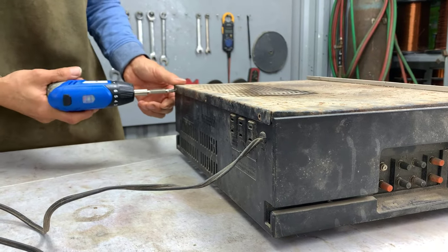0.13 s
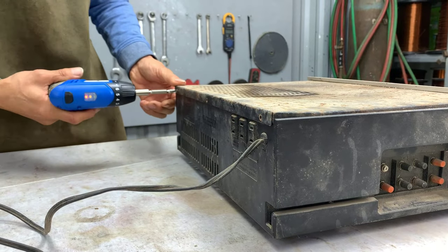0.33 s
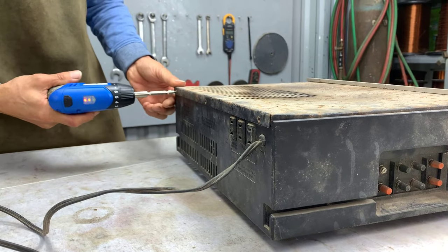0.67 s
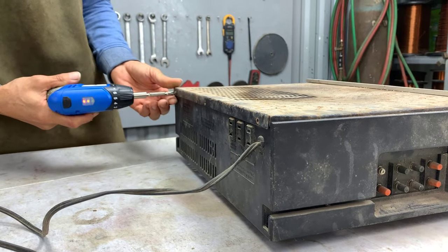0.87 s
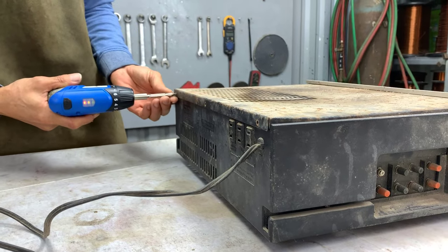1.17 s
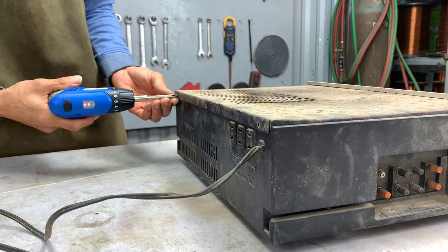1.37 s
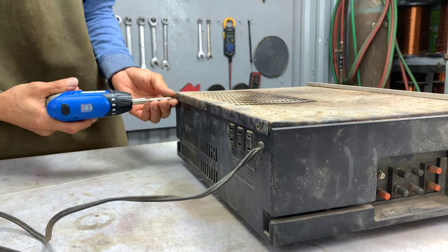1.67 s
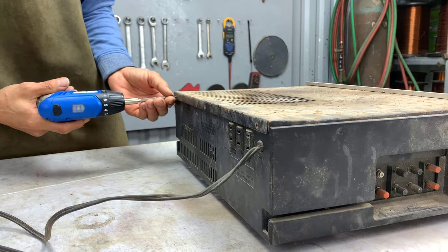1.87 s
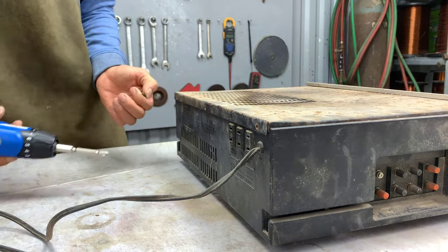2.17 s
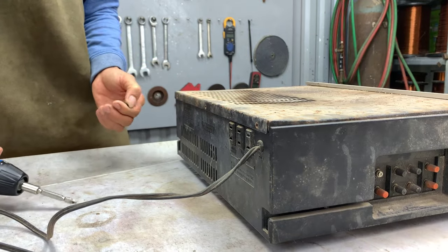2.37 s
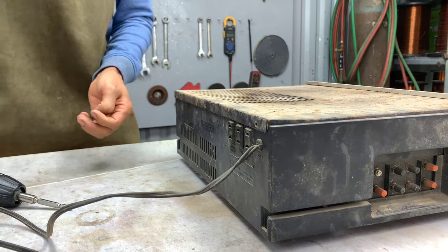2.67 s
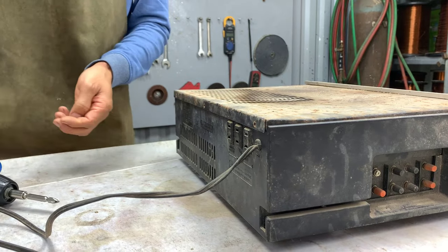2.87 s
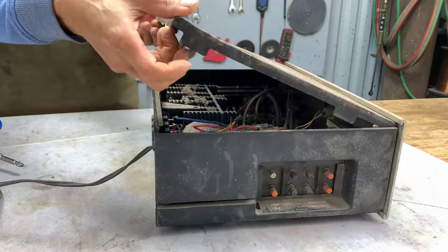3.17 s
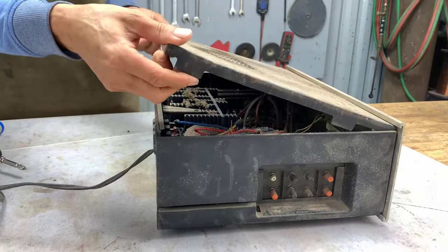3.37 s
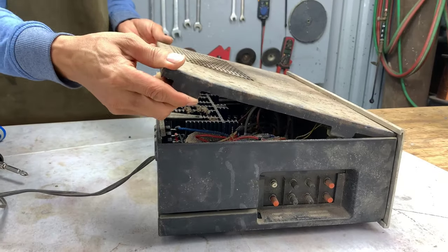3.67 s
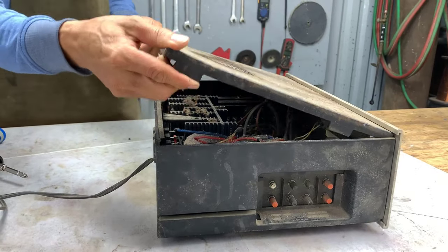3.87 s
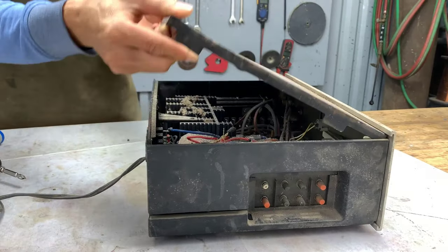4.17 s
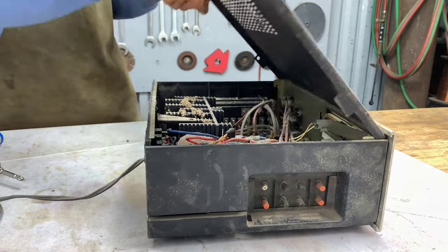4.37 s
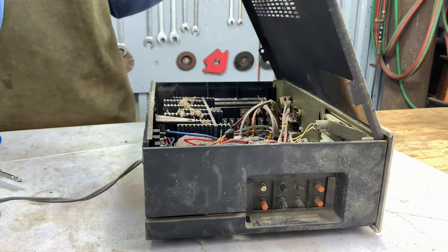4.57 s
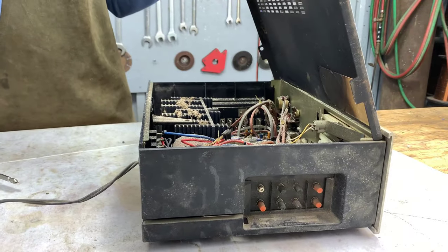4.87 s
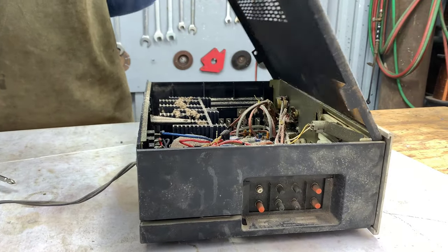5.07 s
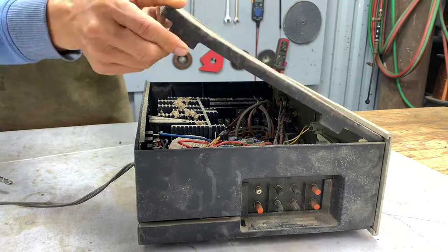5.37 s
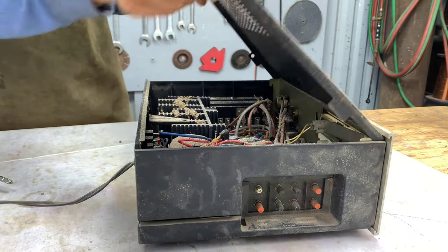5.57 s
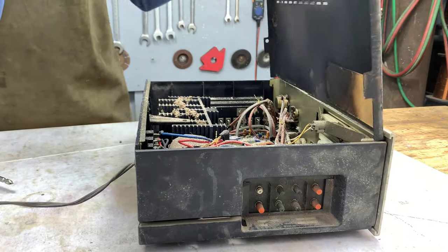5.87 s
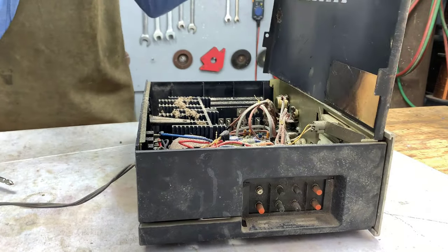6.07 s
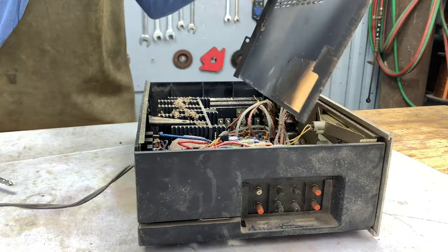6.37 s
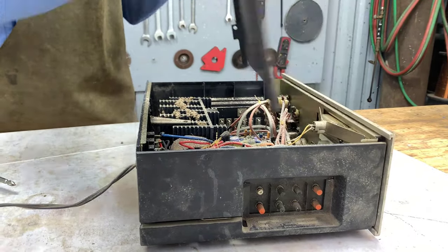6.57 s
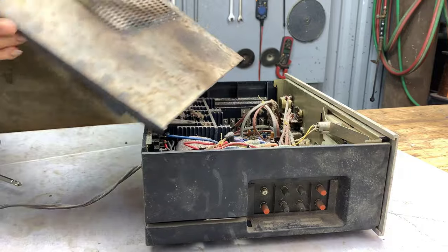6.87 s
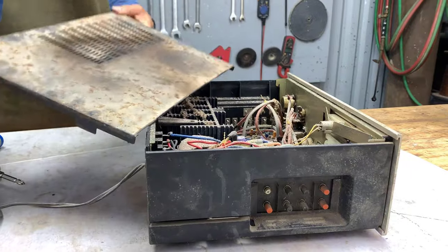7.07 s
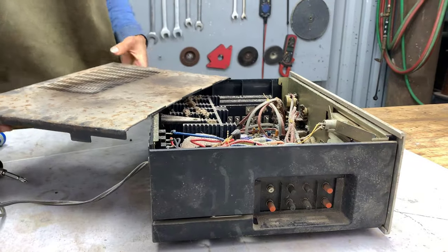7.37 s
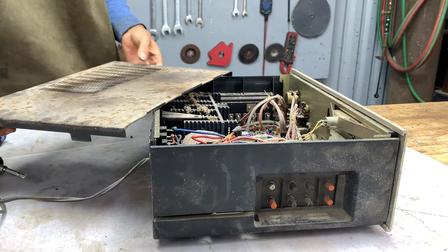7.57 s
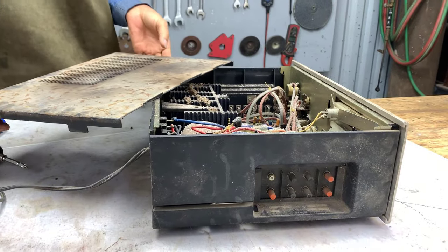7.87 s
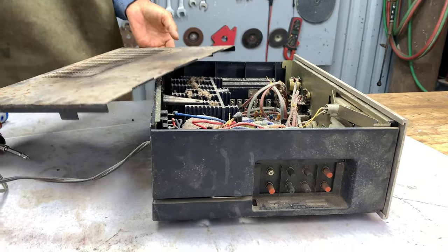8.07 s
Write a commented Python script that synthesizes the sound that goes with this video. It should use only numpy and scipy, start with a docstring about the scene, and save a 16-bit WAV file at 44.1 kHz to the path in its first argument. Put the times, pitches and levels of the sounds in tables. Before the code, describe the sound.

A small cordless screwdriver backs out a screw in two brief whirring bursts, the first rougher and louder, each coasting down. Its case lands on the bench with a quick cluster of dull knocks. Then a sheet-metal cover is tilted with light ticks, scrapes and thin high squeals, comes free and clatters with hollow clangs. Close stereo microphone, quiet small workshop with short diffuse reflections and faint air noise.

```python
"""Small, quiet workshop: a cordless screwdriver backs a screw out of an amplifier in two bursts; its case bumps on the bench.
The sheet-metal cover is tilted up, ticks and scrapes at the rim, comes free and clatters down on the chassis.
Thin arching squeals, mostly near 4 kHz, come and go.
Drive: shaft-locked noise and tones. Impacts: decaying modes and noise. Handling: swells of grainy noise.
Squeals: gliding sines. Diffuse reflections and a faint air noise surround them."""
import sys
import numpy as np
from scipy import signal
from scipy.fft import rfft, irfft, next_fast_len
from scipy.io import wavfile
from scipy.ndimage import map_coordinates

SR = 44100
rng = np.random.default_rng(int(sys.argv[2]) if len(sys.argv) > 2 else 0)


def wav_out(sig):
    """Save sig, one row per channel (or a flat mono array), as 16-bit PCM at SR to the path in sys.argv[1]."""
    wavfile.write(sys.argv[1], SR, np.round(np.clip(np.atleast_2d(sig).T, -1, 1) * 32767).astype(np.int16))


N = 362061
TIME = np.arange(N) / SR
RING = TIME[:SR * 4 // 5]  # time axis of one impact [s]

# All table levels are relative; functions add trims.
# motor and gear tones: (multiple of shaft rate, level [dB])
SHAFT_ORDERS = [(1.52, -2), (2, -9), (3, 0.5), (3.17, -34), (3.82, -9), (4.1, -18), (4.46, -11), (5, 3),
                (5.27, -10.5), (5.9, -19), (11, 11.5), (18, -16), (22, -7), (25, 4.5), (30, 6), (36, -2),
                (37, -2), (39, -2)]
# screwdriver housing and pressed panel resonances: (frequency [Hz], width [Hz], gain [dB])
HOUSING_MODES = [(555, 50, 6), (1156, 210, -24.5), (1644, 40, 11.5), (1990, 260, 10.5), (2225, 22, 3.5),
                 (3100, 200, 8), (6080, 170, 6.5), (7100, 130, 2.5), (8500, 550, 8.5), (9570, 360, 3.5)]
# trigger pulls: (pressed [s], released [s], full speed [turns/s])
TRIGGER_PULLS = [(0.382, 0.939, 364.7), (1.202, 1.67, 375.6)]
# screw binds: (time [s], length [s], resonance [Hz], groan [dB], grinding [dB])
SCREW_BINDS = [(0.409, 0.084, 1953, -47, -69), (0.432, 0.068, 571, -45.5, -61),
               (0.508, 0.083, 1483, -49.5, -50.5), (0.7, 0.063, 1169, -48, -45.5),
               (0.973, 0.13, 1838, -53.5, -59), (1.245, 0.041, 800, -47.5, -43.5),
               (1.485, 0.047, 547, -50, -52.5)]
# gear noise spectrum: (frequency [Hz], density [dB])
GEAR_SPECTRUM = [(1290, -10.5), (2200, -5.5), (3710, -12.5), (3930, -13), (5440, -6), (5810, -6),
                 (6310, -13.5), (6920, 1.5), (7710, -12), (9020, -10), (12200, -11.5), (14100, -3),
                 (15300, -15.5), (16000, -32.5)]
# screw thread spectrum: (frequency [Hz], density [dB])
GRIND_SPECTRUM = [(47, -41), (80, -6), (156, 31.5), (233, 14), (271, -5), (349, 0.5), (387, -5.5),
                  (553, -20.5), (756, -9.5), (1160, 10), (1390, -2.5), (1900, -1.5), (2800, -34),
                  (3640, -33.5), (6160, -120)]

# blows on the cover: (time [s], clang [dB], boom [dB], edge [dB], t60 [s])
COVER_BLOWS = [(1.229, -35.5, -54, -66, 0.13), (2.486, -51, -37.5, -66, 0.061),
               (3.811, -52, -48, -73, 0.15), (3.877, -64, -60, -59, 0.098), (3.977, -35.5, -51, -77, 0.13),
               (4.003, -36.5, -38, -59, 0.078), (4.043, -40, -50, -64, 0.057),
               (4.312, -52, -80, -49, 0.033), (4.616, -46, -77.5, -55.5, 0.13),
               (4.644, -51.5, -62, -57, 0.073), (4.676, -60, -47, -81, 0.096),
               (4.997, -52.5, -85, -71, 0.1), (5.026, -47.5, -79, -40, 0.086),
               (5.146, -61, -62, -65, 0.037), (5.124, -58, -50, -79, 0.12), (5.204, -41, -42.5, -51, 0.062),
               (5.215, -31.5, -47, -38, 0.08), (5.361, -68, -63, -66.5, 0.26), (5.724, -39, -60, -53, 0.22),
               (5.774, -47, -41.5, -67, 0.09), (5.862, -48.5, -45.5, -51, 0.13),
               (6.306, -58.5, -47.5, -56, 0.091), (6.958, -21.5, -33.5, -35, 0.16),
               (6.98, -33.5, -29, -62, 0.16), (7.121, -24, -22.5, -32, 0.23),
               (7.144, -28.5, -34, -38.5, 0.39), (7.181, -38, -27, -45.5, 0.18),
               (7.264, -53, -51, -67.5, .1), (7.314, -22.5, -31.5, -40, 0.15),
               (7.357, -38, -37.5, -54, 0.24), (7.435, -24, -30.5, -38, 0.18),
               (7.46, -31, -35.5, -42.5, 0.07), (7.487, -44, -45.5, -59, .06)]
# cover modes: (frequency [Hz], level [dB], t60 [s])
COVER_MODES = [(138.4, 2, 0.29), (175.1, -7, 0.44), (228, 0.5, 0.11), (296.3, -8.5, 0.27),
               (370.6, -16, 0.32), (449, -21.5, 0.21), (579, -6, 0.33), (620, -15, 0.55),
               (639, -11.5, 0.053), (774, -13, 0.27), (844, -16, 0.49), (1003.5, -9.5, 0.29),
               (1059, -6.5, 0.16), (1103, -15.5, 0.15), (1178, -15, 0.14), (1201, -4, 0.085),
               (1272, -12, 0.073), (1329, -10, 0.077), (1440, -12, 0.26), (1558, -13, 0.21),
               (1700, -7.5, 0.11), (1766, -16.5, 0.18), (1950, -24.5, 0.19), (2390, -30.5, 0.5),
               (2680, -18, 0.39), (2800, -24.5, 0.15), (3090, -17, 0.41), (3250, -26.5, .22),
               (4060, -33, 0.13), (4730, -28, 0.18), (5030, -22.5, 0.11), (5450, -24, 0.13),
               (5900, -19.5, 0.099)]
# sheet-metal blow spectrum: (frequency [Hz], density [dB])
SHEET_SPECTRUM = [(24, -44.5), (40, -22), (104, 2), (140, 8), (320, -3), (372, -5.5), (422, -16),
                  (570, -6.5), (733, -12), (1270, -11.5), (1950, -21), (6020, -30), (9690, -42.5),
                  (10400, -40.5), (16000, -56.5)]
# dull low thumps, case bumps near 2.9 s, low knocks under later cover blows:
# (time [s], level [dB], t60 [s], contact time [ms])
LOW_THUMPS = [(2.49, -39.5, 0.17, 0.96), (2.824, -18, 0.11, 2), (2.833, -24, 0.3, 0.25),
              (2.862, -25.5, .2, 0.49), (2.882, -12, 0.2, 0.4), (2.900, -9.5, 0.14, 0.64),
              (2.921, -14, 0.13, 1.75), (2.949, -15.5, 0.12, 2.8), (4.665, -44.5, 0.14, 0.24),
              (5.22, -32, 0.16, 0.28), (5.371, -46.5, 0.12, 1.4)]
# modes of the case on the bench: (frequency [Hz], level [dB], t60 [s])
CASE_MODES = [(125, -5, 0.12), (137.2, -31, 0.3), (205, -3, 0.04), (238.5, -3, 0.046), (293.5, -6, 0.16),
              (334.3, -8, 0.21), (405, -13.5, 0.16), (476.5, -13, 0.14), (716, -12.5, 0.067),
              (798.3, -8.5, 0.097), (995, -17.5, 0.07), (1245, -28.5, 0.068)]
# thump thud spectrum: (frequency [Hz], density [dB])
THUD_SPECTRUM = [(24, -53), (40, -43), (107, -10), (160, -27.5), (234, 21.5), (314, -25.5), (348, 10.5),
                 (443, -18.5), (475, -15.5), (565, -2), (812, -18), (932, -25.5), (2500, -67.5),
                 (3250, -104), (5500, -120)]
# rim ticks on the chassis: (time [s], level [dB], t60 [s], left minus right [dB], crack [dB])
RIM_TICKS = [(2.923, -60, 0.08, -0.5, -72.5), (3.196, -72, 0.08, 1, -64), (3.8823, -58.5, 0.21, -1, -49.5),
             (4.755, -39, 0.16, -1, -51), (5.023, -42.5, 0.16, -3, -47), (5.147, -47, 0.38, -2, -47),
             (5.184, -52, 0.091, -3, -52), (5.217, -63, 0.059, -5, -54), (5.284, -53, 0.2, -1, -52),
             (5.4094, -44, 0.071, -1, -54), (5.418, -48, 0.09, -2, -48), (5.688, -50.5, 0.2, 0, -60),
             (6.289, -42.5, 0.11, -0.5, -41.5), (6.5978, -85, 0.39, -5.5, -71)]
# tick spectrum: (frequency [Hz], density [dB])
TICK_SPECTRUM = [(710, -19.5), (1200, -24), (1910, -16), (2920, -4), (3470, -8.5), (4220, -4.5),
                 (4600, -5.5), (14800, -4.5), (16000, 2.5)]

# handling strokes, cover scrapes, rubs and flexes; low panel rumble under the screwdriver at 1.46 s:
# (middle [s], length [s], dry scraping [dB], rubbing [dB], flexing [dB])
HANDLING_STROKES = [(.085, 0.076, -92, -72.5, -63), (.21, 0.35, -102, -85, -64),
                    (1.46, 0.32, -100, -97, -59.5), (2.43, 0.25, -99, -89, -58),
                    (2.67, 0.25, -84.5, -93.5, -76.5), (2.9, 0.0814, -74.5, -64.5, -44.5),
                    (3.315, 0.035, -67.5, -76.5, -62), (3.35, 0.22, -92, -97, -63.5),
                    (3.78, 0.24, -89, -77.5, -64.5), (4.0, 0.086, -73.5, -60, -45.5),
                    (4.12, 0.14, -65, -64, -91), (4.29, 0.19, -71, -67, -59), (4.55, 0.15, -74, -77.5, -67),
                    (4.7, 0.16, -78.5, -77, -61), (4.85, 0.074, -71.5, -88, -63),
                    (4.95, 0.15, -107, -78.5, -66.5), (5.19, 0.25, -66, -61.5, -57.5),
                    (5.43, 0.16, -67.5, -85, -73), (5.69, 0.12, -66.5, -70, -90),
                    (5.78, 0.17, -69, -59.5, -52.5), (6.03, 0.086, -66, -74, -66),
                    (6.13, 0.074, -76.5, -99, -63.5), (6.33, 0.24, -80, -78, -60),
                    (6.63, 0.1, -69, -106, -85), (6.79, 0.099, -80.5, -108, -91),
                    (6.925, 0.05, -62, -85, -80.5), (6.98, 0.077, -65, -51, -46),
                    (7.33, 0.28, -60, -52.5, -48.5), (7.48, 0.092, -86, -48, -39)]
# sliding-metal swishes: (middle [s], length [s], centre [Hz], glide [Hz/s], level [dB])
METAL_SWISHES = [(0.224, 0.13, 3780, -1500, -83), (4.022, 0.19, 3266, 1204.5, -63.5),
                 (4.211, 0.22, 3330, 503.5, -64.5), (4.218, 0.28, 6590, -1500, -72),
                 (4.389, 0.077, 6460, -2000, -78.5), (4.53, 0.13, 5520, -9000, -76),
                 (5.519, 0.091, 4400, -5000, -71), (7.046, 0.3, 3400, -500, -60),
                 (7.259, 0.026, 3600, 3, -53.5), (7.525, 0.14, 2860, -2000, -67)]
# cover judders on the rim, panel honks: (middle [s], length [s], resonance [Hz], level [dB])
RIM_JUDDERS = [(.17, .11, 570, -68.5), (2.361, 0.27, 592, -77), (3.885, 0.015, 930, -54),
               (4.05, 0.012, 973, -47.5), (4.286, 0.04, 607, -74), (4.629, 0.041, 937, -55.5),
               (4.688, 0.015, 521, -54), (4.738, 0.14, 313.5, -62), (5.14, 0.059, 896, -59.5),
               (5.175, 0.052, 622, -56.5), (5.23, 0.05, 327, -50), (5.366, 0.02, 594, -58.5),
               (5.734, 0.022, 983, -43), (5.777, 0.036, 833, -49.5), (5.799, .09, 358.4, -63),
               (6.968, 0.014, 1780, -33.5), (7.33, 0.046, 1248, -38.5), (7.76, 0.22, 570, -68.5)]
# sleeve brushes past as the hand lets go: (middle [s], length [s], hiss [dB], rubbing [dB], flutter [dB])
SLEEVE_STROKES = [(7.88, 0.12, -99, -68.5, -55), (7.99, 0.17, -63, -64.5, -66.5)]
# sleeve hiss spectrum: (frequency [Hz], density [dB])
SLEEVE_SPECTRUM = [(1470, -11), (2500, -3), (3230, -1.5), (4310, -13.5), (5480, -2.5), (7710, -12),
                   (14000, -9), (16000, -11)]
# rim scraping spectrum: (frequency [Hz], density [dB])
RIM_SPECTRUM = [(2470, -34.5), (4200, 0), (6280, 3.5), (7390, 1), (13100, -0.5), (14600, -5.5),
                (15600, -12.5), (16000, -20)]
# rubbing spectrum: (frequency [Hz], density [dB])
RUB_SPECTRUM = [(210, -25.5), (350, 3.5), (1040, -5.5), (1400, -2.5), (1470, -5), (1810, -3), (2260, -8.5),
                (3360, -5.5), (3840, -20.5), (4000, -14.5), (5200, -35), (8800, -120)]
# flexing-panel rumble spectrum: (frequency [Hz], density [dB])
FLEX_SPECTRUM = [(18, -49), (30, -14.5), (64, 14.5), (92, -1.5), (144, -1), (175, -15), (219, 6.5),
                 (261, -13.5), (326, -10), (377, -21), (700, -16.5), (910, -45), (1540, -120)]

# squeals: (crest [s], rise [s], fall [s], crest pitch [Hz], droop at far end [Hz], level [dB], lower strand [dB])
SQUEAL_ARCHES = [(.06, .06, .06, 4210, 42, -80.5, -8), (2.186, 0.14, 0.11, 4406, 122, -67, -9),
                 (2.615, 0.15, 0.076, 4365, 167.5, -54.5, -17.5), (3.143, 0.12, .016, 4200, -56, -72.5, -2),
                 (4.669, 0.11, 0.17, 4380, 84, -52.5, -11), (5.148, .17, 0.1, 4343, 201.5, -44.5, -7),
                 (5.7, .1, 0.034, 3820, 180, -59, -3), (5.88, 0.17, 0.11, 4332, 265, -40, -7.5),
                 (6.543, 0.2, 0.077, 4188, 261, -40, -12), (6.74, 0.06, 0.22, 3892, 249.5, -42, -7.5),
                 (7.886, 0.066, 0.038, 1368, 50, -55.5, -16)]
# squeal flares: (time [s], rise above the arch [dB])
SQUEAL_FLARES = [(2.64, 8.5), (4.72, 10), (5.053, 9.5), (5.151, 10.5), (5.728, 8.5), (5.897, 7), (5.956, 7),
                 (6.391, 14), (6.47, 7), (6.526, 13), (6.6, 10), (6.747, 11), (6.864, 8.5), (6.903, 16),
                 (6.935, 9.5)]
# squeal breaks off its pitch: (time [s], length [s], jump [Hz])
PITCH_BREAKS = [(4.763, 0.099, -68.5), (5.932, 0.018, -200), (5.984, 0.015, 211.5), (6.351, .03, -300),
                (6.488, .014, 286), (6.554, 0.02, -200), (6.682, .025, -220), (6.77, .015, -280),
                (6.839, .018, -260), (6.898, 0.042, -90.5)]

# room air spectrum: (frequency [Hz], density [dB])
AIR_SPECTRUM = [(15, -38), (25, -7.5), (70, -1.5), (161, -5.5), (212, -15.5), (277, -16), (545, -17.5),
                (2480, -40), (4250, -42.5), (4740, -37.5), (5730, -43), (10100, -62), (16000, -52.5)]
# stereo width: (frequency [Hz], side minus mid [dB])
STEREO_WIDTH = [(60, -15), (250, -15.5), (600, -5.5), (1400, -6), (2200, -0.5), (12000, -0.5)]

START_HZ, SPIN_UP_S, COAST_HZ_PER_S = 307.2, 0.054, 350
STOP_S, STOP_FADE_S = 1.985, 0.0088
LOOSEN_S = 0.27  # time constant of the screw working loose
LET_DOWN_S = 7.05
FLOOR_FROM_S, FLOOR_TO_S = 3.19, 8.1


def screwdriver(bind_db=-3, mesh=0.13, grit_db=1.5, rattle_db=1.04, hum_db=-68, tones_db=-75.0,
                tones_slack_db=-15, tones_tight_db=5, wobble=0.00202, tight_wobble=0.008,
                dulling_db=-36, throb=0.18, gear_ratio=9):
    """Gears clatter in step with the shaft, motor and gears sing its multiples, the screw grinds in its thread."""
    speed_hz, slack = motor_speed()
    gear, screw = drive_levels(slack)
    binding = sum(undb(db + bind_db) * swell(TIME, s, length) for s, length, _, _, db in SCREW_BINDS)

    # tight screw drags unevenly on the motor
    tight = np.exp(-np.maximum(TIME - TRIGGER_PULLS[0][0], 0) / LOOSEN_S)
    unsteady = 1 + wobble * walk(30) + tight_wobble * tight * walk(20.2)
    turns = np.cumsum(speed_hz * unsteady) / SR
    angle = 2 * np.pi * turns
    teeth = (1 + mesh * np.cos(angle)) * undb(grit_db * walk(2500) + rattle_db * walk(130))
    hiss = colour(clatter(turns, repeat=0.39) * teeth, GEAR_SPECTRUM) * gear

    # thread binds and slips: its resonances swell apart
    thread = clatter(turns, repeat=0.061) * teeth
    low, middle, high = [
        colour(thread, GRIND_SPECTRUM, lo_hz=lo, hi_hz=hi) * undb(db + 2 * walk(45.27))
        for lo, hi, db in [(313, 1060, -10), (770, 930, -13.5), (1650, 5400, -13.5)]]
    # high band throbs with the slower second gear stage
    high = high * (1 + throb * np.cos(angle / gear_ratio))
    grind = (low + middle + high) * (screw + binding)

    hum = colour(noise(), FLEX_SPECTRUM, lo_hz=66.0) * undb(hum_db + 2 * walk(27.0))
    tones = np.zeros(N)
    for order, db in SHAFT_ORDERS:
        # high multiples die first as the motor slows
        level = undb(db + 3.5 * walk(30) + dulling_db * max(order - 5, 0) * slack)
        tones += level * np.sin(order * angle + 0.4 * walk(150))
    whine = tones * undb(tones_db + tones_slack_db * slack + tones_tight_db * tight)
    whirr = mottle(resonate(hiss + grind, HOUSING_MODES), depth_db=4.8, per_octave=20, rate_hz=17)
    running = between(TRIGGER_PULLS[0][0], STOP_S, fall_s=STOP_FADE_S)
    return from_left((whirr + hum + whine + groans()) * running, samples=7)


def motor_speed():
    """Turns/s and fractional shortfall: a pull leaps to START_HZ and eases to full speed; a release coasts."""
    speed_hz, slack = np.full(N, 1. * START_HZ), np.zeros(N)
    for pressed, released, full_hz in TRIGGER_PULLS:
        on = TIME >= pressed - SPIN_UP_S / 10
        spin_up_hz = (full_hz - START_HZ) * np.exp((pressed - TIME[on]) / SPIN_UP_S)
        coast_hz = COAST_HZ_PER_S * np.maximum(TIME[on] - released, 0)
        speed_hz[on] = np.maximum(full_hz - (spin_up_hz + coast_hz), 0)
        slack[on] = 1 - speed_hz[on] / full_hz
    return speed_hz, slack


def drive_levels(slack, gear_db=-64.0, gear_tight_db=17, gear_slack_db=-72, take_up_s=0.037,
                 screw_db=-63.5, screw_tight_db=20, screw_slack_db=-44):
    """Gear and screw gains: louder while tight, quieter below full speed; gears take up load gradually."""
    since = np.maximum(TIME - TRIGGER_PULLS[0][0], 0)
    tight = np.exp(-since / LOOSEN_S)
    gear = undb(gear_db + gear_tight_db * tight + gear_slack_db * slack)
    screw = undb(screw_db + screw_tight_db * tight + screw_slack_db * slack)
    return gear * (1 - np.exp(-since / take_up_s)), screw


def clatter(turns, repeat, count=128):
    """Noise partly repeating each shaft turn (count values per turn), so its lines glide with speed."""
    laps = rng.standard_normal((2, N // count, count))
    laps = signal.lfilter([1], [1, -repeat], laps, axis=1).reshape(2, -1)
    return unit(np.array([map_coordinates(ear, [turns * count], order=3, mode="wrap") for ear in laps]))


def groans(width_hz=170):
    """Each bind swells and dies in one panel resonance."""
    return sum(narrow(s, length, hz, 0, width_hz) * undb(db) for s, length, hz, db, _ in SCREW_BINDS)


def blows(clang_db=-6.0, boom_db=-4, edge_db=-1, modes_db=-5.5, rise_s=0.0018, crack_db=-1, smack_db=-1,
          beat_hz=7, held_t60_s=0.23, shimmer_db=-27, shimmer_t60_s=0.22):
    """A blow sets off smack, boom, dense clang and bright edge; panel modes ring in beating pairs over a shimmer."""
    out = np.zeros((2, N))
    low = colour(noise(), SHEET_SPECTRUM, lo_hz=75, hi_hz=308)
    mid = colour(plate(), SHEET_SPECTRUM, lo_hz=420, hi_hz=2500)
    top = colour(plate(), SHEET_SPECTRUM, lo_hz=2700, hi_hz=34000)
    crack = colour(noise(), TICK_SPECTRUM)
    rings = []
    for hz, _, t60 in COVER_MODES:
        beat = 1 + 0.021 * np.exp(2j * np.pi * beat_hz * rng.normal(1, 0.29) * RING)
        rings.append(fade(t60) * np.exp(2j * np.pi * hz * RING) * beat)
    for s, clang, boom, edge, t60 in COVER_BLOWS:
        sound = piece(low) * undb(boom + boom_db) * fade(1.45 * t60) * (1 - np.exp(-RING / 0.016))
        clang_fade = undb(clang + clang_db) * fade(1.09 * t60)
        smack_fade = undb(clang + smack_db) * fade(0.01)
        sound += piece(mid) * (clang_fade + smack_fade)
        sound += piece(top) * undb(edge + edge_db) * fade(0.89 * t60)
        sound += piece(crack) * undb(edge + crack_db) * fade(0.043)
        # hands damp the modes until the cover is let down
        damping = fade(held_t60_s) if s < LET_DOWN_S else 1
        sound += piece(mid) * undb(clang + shimmer_db) * fade(shimmer_t60_s) * damping
        draws = rng.standard_normal((len(COVER_MODES), 3))
        for (hz, db, _), ring, (size, phase, spread) in zip(COVER_MODES, rings, draws):
            # random strike point sets each mode's strength
            strength = undb((boom if hz < 400 else clang) + modes_db + db + 0.71 * size)
            ear_phase = np.array([[1], [-1]]) * spread * min(hz / 6000, 1)
            sound += np.imag(strength * np.exp(1j * (2 * np.pi * phase + ear_phase)) * ring) * damping
        add(out, s, sound * (1 - np.exp(-RING / rise_s)))
    return from_left(out, samples=6)


def plate(spacing_hz=42, noisy_db=-7):
    """Countless weak modes of thin sheet metal: one endless ring over a little noise."""
    lines = rng.random(N // 2 + 1) < SR / N / spacing_hz
    return unit(irfft(rfft(noise()) * lines, N)) + undb(noisy_db) * noise()


def thumps(ring_db=-2.0, thud_db=-5.5, rise_s=0.0019, muffle_hz=1300):
    """Case bumps and low knocks under cover blows: modes and thud; longer contact leaves only the low modes."""
    out = np.zeros((2, N))
    ring = sum(undb(db) * np.sin(2 * np.pi * hz * RING) * fade(t60) for hz, db, t60 in CASE_MODES)
    thud = colour(noise(), THUD_SPECTRUM, hi_hz=1191)
    push_time = RING[:SR // 20]
    for s, db, t60, contact_ms in LOW_THUMPS:
        body = undb(ring_db) * ring + undb(thud_db) * piece(thud) * fade(t60)
        body = body * (1 - np.exp(-RING / rise_s))
        push = push_time * np.exp(-push_time * 4000 / contact_ms)  # contact force
        add(out, s, undb(db) * signal.fftconvolve(body, push[None] / push.sum(), axes=1))
    muffle = signal.butter(4, muffle_hz, fs=SR, output="sos")
    return from_left(signal.sosfilt(muffle, out + 1e-18), samples=8)


def ticks(snap_db=2, tail_db=-7, snap_t60_s=0.023, click_db=4, crack_t60_s=0.0028):
    """Rim slips off a catch: hard crack, snap and short bright ring."""
    out = np.zeros((2, N))
    bright = colour(plate(spacing_hz=112, noisy_db=-6), TICK_SPECTRUM)
    edge = colour(noise(), TICK_SPECTRUM)
    for s, db, t60, pan_db, crack_db in RIM_TICKS:
        shape = undb(click_db) * fade(0.01) + undb(snap_db) * fade(snap_t60_s) + undb(tail_db) * fade(t60)
        shape = shape * (1 - np.exp(-RING / 0.001))
        crack = piece(edge)[0] * undb(crack_db - 60 * RING / crack_t60_s)
        pan = undb(np.array([[pan_db], [-pan_db]]) / 2)
        add(out, s, (piece(bright) * shape * undb(db) + crack) * pan)
    return out


def handling(strokes_db=1, sleeve_db=-1, swish_width_hz=480, judder_width_hz=220,
             floor_rumble_db=-71, floor_rub_db=-88, floor_drift_db=3):
    """Panels rumble and flex, the cover scrapes and judders, its rim swishes on the chassis; a sleeve brushes
    past. From 3.19 s a low rumble and rub fill the background."""
    swish = sum(narrow(s, length, hz, glide, swish_width_hz) * undb(db)
                for s, length, hz, glide, db in METAL_SWISHES)
    swish = swish * undb(1.0 * walk(40))
    judder = sum(narrow(s, length, hz, 0, judder_width_hz) * undb(db) for s, length, hz, db in RIM_JUDDERS)
    strokes = undb(strokes_db) * friction(HANDLING_STROKES, RIM_SPECTRUM, grain_db=2.0, stick_db=5.0)
    floor = colour(noise(), FLEX_SPECTRUM) * undb(floor_rumble_db)
    floor = floor + colour(noise(), RUB_SPECTRUM) * undb(floor_rub_db)
    floor = floor * undb(floor_drift_db * walk(7.3)) * between(FLOOR_FROM_S, FLOOR_TO_S)
    sleeve = undb(sleeve_db) * friction(SLEEVE_STROKES, SLEEVE_SPECTRUM, grain_db=3.0, stick_db=2.0)
    # contact points wander: different resonances answer
    return swish + judder + mottle(strokes + floor + sleeve, depth_db=5, per_octave=12, rate_hz=18)


def friction(strokes, hiss_spectrum, grain_db, stick_db):
    """Each stroke swells as hiss and rub, both in uneven grains, and as a low rumble."""
    swells = np.array([swell(TIME, s, length) for s, length, *_ in strokes])
    hiss, rub, rumble = undb([row[2:] for row in strokes]).T @ swells
    slips = undb(grain_db * walk(2500) + stick_db * walk(50))
    out = colour(noise() * slips, hiss_spectrum) * hiss
    out = out + colour(noise() * slips, RUB_SPECTRUM) * rub
    return out + colour(noise(), FLEX_SPECTRUM) * rumble


def squeals(direct_db=-6, wet_db=-6, t60_s=0.28, waver=0.0042, slip=0.011, overtone_db=-32, flutter_db=3.0,
            ends_db=-11, flare_s=0.011, strand_sag=0.045):
    """Thin tone arches over a rough, sagging lower strand; it flutters, flares, breaks pitch and is room-smeared."""
    out = np.zeros(N)
    unsteady = 1 + waver * walk(400) - slip * np.clip(walk(110), 0, 1) ** 2
    lower, lower_gain = 1 - strand_sag * np.abs(walk(220)), undb(3.5 * walk(60))
    jumps_hz = sum(hz * swell(TIME, s, length) for s, length, hz in PITCH_BREAKS)
    flares_db = sum(db * swell(TIME, s, flare_s) for s, db in SQUEAL_FLARES)
    flutter = undb(flutter_db * walk(110) + flares_db)
    for crest, rise, fall, top_hz, droop_hz, db, strand_db in SQUEAL_ARCHES:
        on = (TIME > crest - rise) & (TIME < crest + fall)
        t = TIME[on] - crest
        away = np.where(t < 0, -t / rise, t / fall)  # 0 at crest, 1 at ends
        arch_hz = top_hz - droop_hz * (t / max(rise, fall)) ** 2
        angle = 2 * np.pi * np.cumsum(arch_hz * unsteady[on] + jumps_hz[on]) / SR
        strand = np.sin(2 * np.pi * np.cumsum(arch_hz * lower[on]) / SR) * lower_gain[on]
        tone = np.sin(angle) + undb(overtone_db) * np.sin(3 * angle) + undb(strand_db) * strand
        out[on] += tone * undb(db + ends_db * away ** 2) * (1 - away ** 20)
    pair = np.array([out, out]) * flutter
    return undb(direct_db) * from_left(pair, samples=2) + undb(wet_db) * workshop(pair, t60_s)


def workshop(x, t60_s, build_s=0.0044):
    """Diffuse reflections as decaying noise, different at each ear."""
    tail = noise(count=len(RING)) * fade(t60_s) * (1 - np.exp(-RING / build_s))
    return signal.fftconvolve(x, tail / np.sqrt(np.sum(tail[0] ** 2)), axes=1)[:, :N]


def room_air(level_db=-73.5):
    """Still air: faint coloured noise, drifting slowly in level."""
    return colour(noise(), AIR_SPECTRUM) * undb(level_db + 2 * walk(1.3))


def undb(db):
    """Decibels to gain."""
    return 10 ** (np.asarray(db) / 20)


def unit(x):
    """Scale to rms 1."""
    return x / np.sqrt(np.mean(x ** 2) + 1e-20)


def noise(count=N):
    """Two unrelated white noises."""
    return rng.standard_normal((2, count))


def walk(rate_hz):
    """Random values of spread 0.91, rate_hz per second, joined by straight lines."""
    steps = rng.standard_normal(N // 8)
    return 0.91 * np.interp(TIME * rate_hz, np.arange(len(steps)), steps)


def gains(points, hz):
    """Read a (frequency [Hz], level [dB]) table on a log-frequency axis."""
    f, db = np.transpose(points)
    return undb(np.interp(np.log(hz + 0.00092), np.log(f), db))


def colour(pair, points, lo_hz=20, hi_hz=20000):
    """Unrelated pair to left/right with a given spectrum and band, mid rms 1; side follows STEREO_WIDTH."""
    n = pair.shape[1]
    size = next_fast_len(n)
    hz = np.arange(size // 2 + 1) * SR / size + 1e-3
    band = 1 / np.sqrt((1 + (lo_hz / hz) ** 10) * (1 + (hz / hi_hz) ** 10))
    mid, side = rfft(pair, size) * gains(points, hz) * band
    mid = irfft(mid, size)[:n]
    side = irfft(side * gains(STEREO_WIDTH, hz), size)[:n]
    return np.array([mid + side, mid - side]) / np.std(mid)


def narrow(s, length, hz, glide, width_hz):
    """A swell of noise in one gliding resonance."""
    out, start = np.zeros((2, N)), max(s - RING[-1] / 2, 0)
    t = start + RING
    low_pass = signal.butter(3, width_hz / 2, fs=SR, output="sos")
    drift = signal.sosfilt(low_pass, noise(count=len(t)) + 1j * noise(count=len(t)))
    carrier = np.exp(2j * np.pi * np.cumsum(hz + glide * (t - s)) / SR)
    mid, side = unit(np.real(drift * carrier))
    add(out, start, np.array([mid + 0.57 * side, mid - 0.34 * side]) * swell(t, s, length))
    return out


def resonate(x, modes):
    """Lift or cut each resonance by its dB."""
    return x + sum((undb(db) - 1) * signal.lfilter(*signal.iirpeak(hz, hz / width, fs=SR), x)
                   for hz, width, db in modes)


def mottle(x, depth_db, per_octave, rate_hz):
    """Narrow bands swell and sink on their own, rate_hz new levels per second."""
    hz, t, bands = signal.stft(x, SR, nperseg=1024)
    where = np.meshgrid(np.log2(1 + hz / 500) * per_octave, t * rate_hz, indexing="ij")
    grid = rng.standard_normal((200, 600))
    level = undb(depth_db * map_coordinates(grid, where, order=1, mode="wrap"))
    return signal.istft(bands * unit(level), SR)[1][:, :N]


def fade(t60_s):
    """Exponential decay from contact; t60 at least 10 ms."""
    return undb(-60 * RING / max(t60_s, 0.01))


def swell(t, s, length):
    """Gaussian rise and fall around time s, length wide at 1/e."""
    return np.exp(-(2 * (t - s) / length) ** 2)


def between(start, end, rise_s=0.0064, fall_s=0.11):
    """1 from start to end, with soft edges."""
    return (1 + np.tanh((TIME - start) / rise_s)) * (1 + np.tanh((end - TIME) / fall_s)) / 4


def piece(x):
    """Random stretch of a long noise, one RING long."""
    i = rng.integers(N - len(RING))
    return x[:, i:i + len(RING)]


def add(out, s, sound):
    """Mix a sound in at time s."""
    i = int(s * SR)
    out[:, i:i + sound.shape[1]] += sound[:, :N - i]


def from_left(x, samples):
    """Sound reaches the right microphone some samples later."""
    return np.array([x[0], np.pad(x[1], (samples, 0))[:N]])


def scene(wet_db=-14, t60_s=0.23):
    """Bench work, its reflections, squeals and room air."""
    bench = screwdriver() + blows() + thumps() + ticks() + handling()
    return bench + undb(wet_db) * workshop(bench, t60_s) + squeals() + room_air()


def record(dry, low_cut_hz=58, top_hz=15900):
    """Microphone loses the deep bass; a steep low-pass cuts the top."""
    thin = signal.sosfilt(signal.butter(3, low_cut_hz, "high", fs=SR, output="sos"), dry)
    return signal.sosfilt(signal.ellip(8, 0.2, 70, top_hz, fs=SR, output="sos"), thin)


dry = scene()
out = record(dry)
wav_out(out)
```